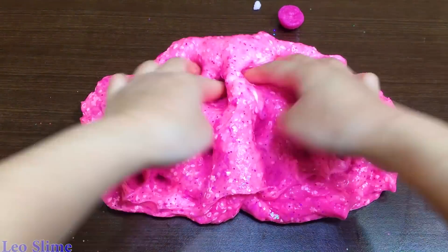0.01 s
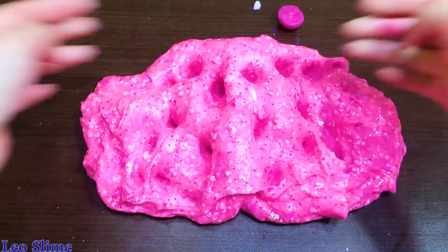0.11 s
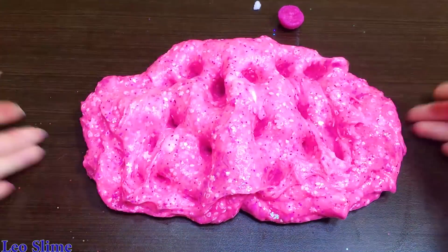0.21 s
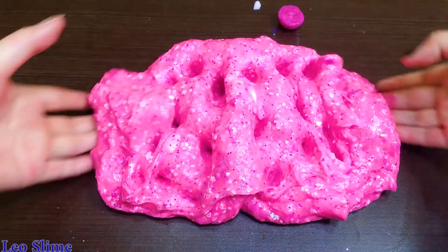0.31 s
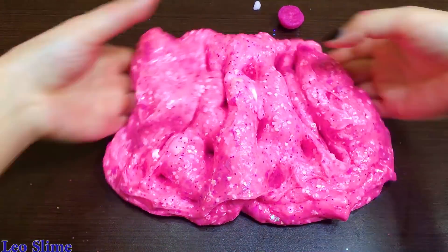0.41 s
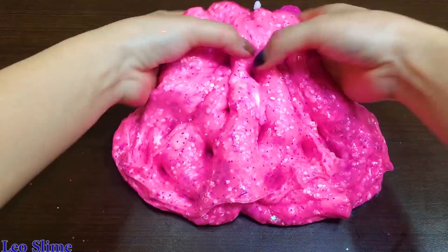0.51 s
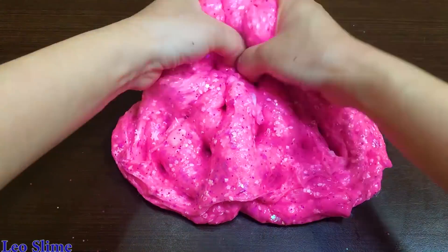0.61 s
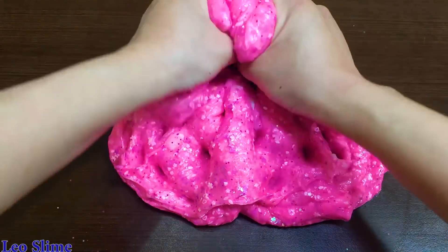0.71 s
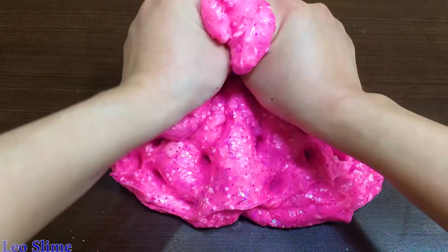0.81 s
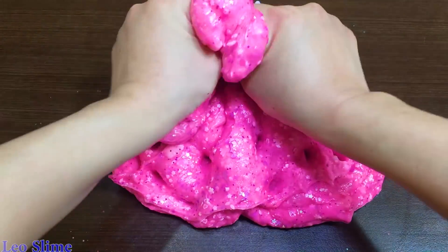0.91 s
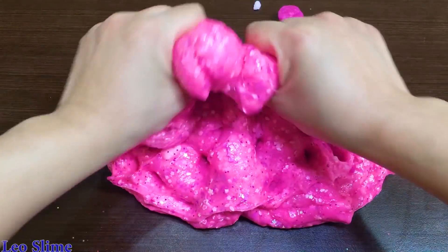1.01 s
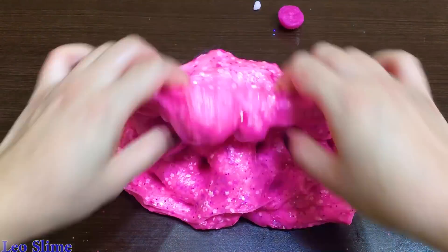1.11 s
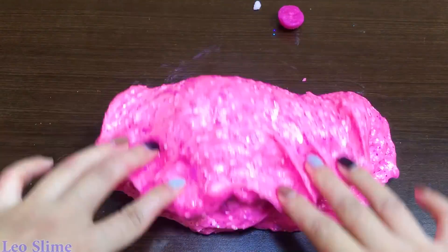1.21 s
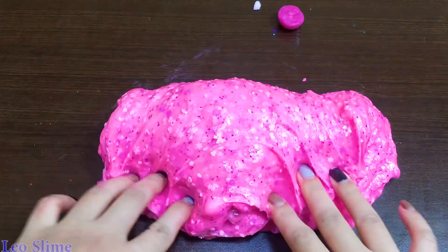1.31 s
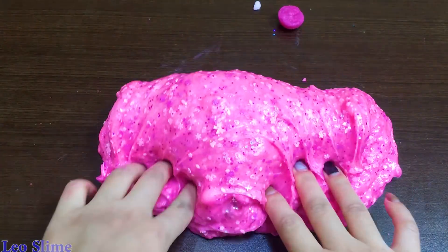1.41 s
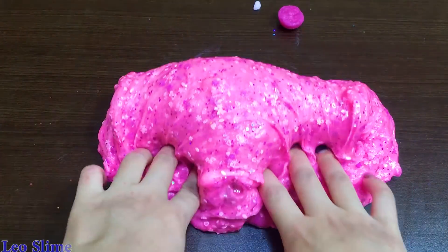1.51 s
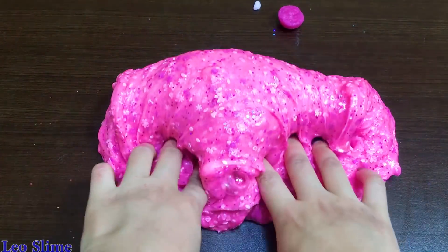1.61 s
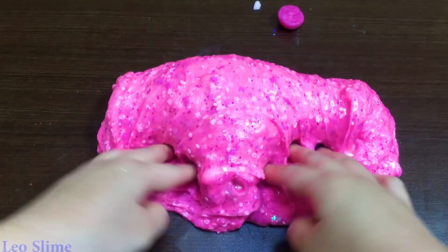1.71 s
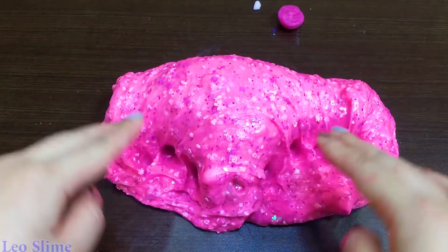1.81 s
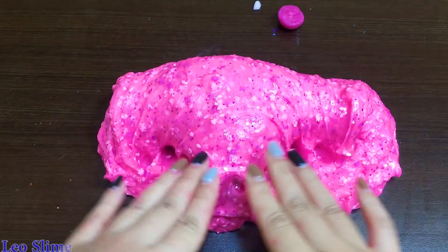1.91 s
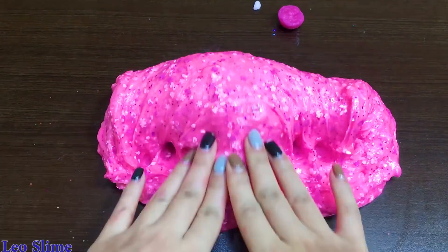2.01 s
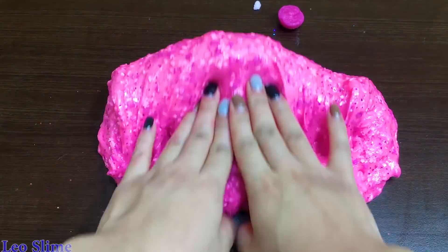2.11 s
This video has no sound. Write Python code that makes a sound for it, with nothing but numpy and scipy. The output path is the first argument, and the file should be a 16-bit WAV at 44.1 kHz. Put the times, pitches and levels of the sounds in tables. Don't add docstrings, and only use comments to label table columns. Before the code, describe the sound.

Hands work wet slime on a wooden table, very close and dry: one sharp rip and burst early, dense bubble snaps while folding, a fainter crackly lull, then a squelchy cluster of pops and low thump.

```python
import sys
import numpy as np
from scipy import signal
from scipy.io import wavfile
from scipy.ndimage import uniform_filter1d

SR = 44100
rng = np.random.default_rng(int(sys.argv[2]) if len(sys.argv) > 2 else 0)


def how_loud(loudness_db):
    steps = np.asarray(loudness_db, float) / 20
    return 10 ** steps


def wrap_up_sound(samples):
    columns = np.atleast_2d(samples).T
    tamed = np.clip(columns, -1, 1)
    steps = np.round(tamed * 32767).astype(np.int16)
    wavfile.write(sys.argv[1], SR, steps)


N = 97020


def evened(x):
    return x / np.sqrt(np.mean(x ** 2) + 1e-20)


def coloured(x, points):
    f, level = np.transpose(points)
    hz = np.abs(np.fft.fftfreq(4096, 1 / SR))
    level_db = np.interp(np.log(hz + 1), np.log(f), level, left=-70, right=-70)
    log_gain = np.log(how_loud(level_db))
    phase = -signal.hilbert(log_gain).imag
    taps = np.fft.ifft(np.exp(log_gain + 1j * phase)).real[:2048]
    return signal.oaconvolve(x, taps)[:len(x)]


def band(x, low_hz, high_hz):
    return signal.sosfilt(signal.butter(2, [low_hz, high_hz], "band", fs=SR, output="sos"), x)


def add(mix, s, sound):
    part = mix[max(round(s * SR), 0):][:len(sound)]
    part += sound[:len(part)]


def room_floor():
    # f/Hz, level/dB per Hz
    spectrum = [(30, -19), (60, -3.5), (250, -14.5), (1000, -19.5), (3000, -40.5), (15500, -39.5),
                (16300, -77.5)]
    return how_loud(-66) * evened(coloured(rng.standard_normal(N), spectrum))


def effort(column):
    # t/s, peeling fizz/dB, wet squish/dB
    knead = np.transpose([(0, -69, -59), (.37, -75, -62.5), (.455, -59, -54), (0.466, -45, -45),
                          (.61, -49, -43), (0.681, -58, -52.5), (.82, -56, -48), (.93, -49, -55.5),
                          (1.05, -53.5, -52), (1.15, -58.5, -65), (1.265, -40.5, -51), (1.35, -64, -62),
                          (1.43, -62.5, -62.5), (1.498, -52, -55), (1.6, -67, -63), (1.71, -63.5, -57.5),
                          (1.821, -70, -63.5), (2.001, -73, -69.5)])
    # t/s, rise/s per 20 dB, fizz/dB, squish/dB, t60/s
    tears = [
        (0.186, 0.029, -43, -70, 0.046),
        (0.203, 0.00056, -22.5, -37, 0.028),
        (0.22, .003, -36.5, -30, 0.18),
        (0.393, 0.0017, -58, -39, 0.1),
        (0.406, 0.002, -46.5, -31, 0.16),
        (1.031, 0.0033, -39, -59, 0.18),
        (1.858, 0.021, -52, -63, 0.061),
        (1.878, 0.0086, -32.5, -31.5, 0.098),
        (1.9, 0.0053, -46, -32.5, 0.19),
    ]
    t = np.arange(N) / SR
    power = how_loud(np.interp(t, knead[0], knead[column])) ** 2
    for row in tears:
        start_s, rise_s, t60_s = row[0], row[1], row[4]
        late = t - start_s
        slope_db = np.where(late < 0, 20 * late / rise_s, -60 * late / t60_s)
        power = power + how_loud(row[1 + column] + slope_db) ** 2
    return np.sqrt(power)


def crackle(per_s, spread_db, points, smooth):
    clump = how_loud(2.6 * evened(uniform_filter1d(rng.standard_normal(N), 260)))
    size = how_loud(spread_db * np.minimum(rng.exponential(1, N), 3.6))
    happens = rng.random(N) < per_s / SR
    ruptures = size * happens * rng.choice([-1, 1], N)
    grains = evened(ruptures) + smooth * rng.standard_normal(N)
    return evened(coloured(clump * grains, points))


def fizz():
    # f/Hz, level/dB per Hz
    spectrum = [(710, -44), (1200, -4), (1860, -6.5), (3920, -10), (6430, -6.5), (13700, -11.5),
                (15800, -9), (16500, -46)]
    return effort(1) * crackle(3500, 3.0, spectrum, 0.55)


def squish():
    # f/Hz, level/dB per Hz
    spectrum = [(76, -60.5), (130, -6), (321, 1.5), (553, -3), (706, -6.5), (901, -5), (4000, -15),
                (5200, -22.5), (8800, -120)]
    return effort(2) * crackle(900, 2.0, spectrum, 1.6)


def table():
    # f/Hz, level/dB, t60/s
    modes = [(55.95, -1, 0.92), (80.8, -5, 0.29), (108.8, -6.5, 0.6), (164.4, -12.5, 0.56),
             (233.8, -10, 0.35), (286, -15, 0.51), (345.3, -12, 0.063)]
    # t/s, level/dB, extra level on the two lowest modes/dB
    pushes = [(0, -61, 11), (.205, -39.5, -7), (.4, -42.5, -2), (.5, -49.5, -3), (.6, -38, -16),
              (.72, -47, -3.5), (.82, -63, 13.5), (.9, -69.5, 14), (.99, -69, 13.5), (1.28, -57.5, 2.5),
              (1.4, -71.5, 9), (1.74, -54.5, -4), (1.885, -33, -12)]
    # from t/s, to t/s
    hands_on = (.3, 1.2)
    push_ms, hum_db, hands_damping = 2.5, -58, 0.75
    t, out = np.arange(SR) / SR, np.zeros(N)
    drive = how_loud(hum_db) * np.sqrt(effort(2) / how_loud(-53.5)) / 60
    stir = rng.standard_normal((len(modes), N)) * drive
    turn = rng.random((len(pushes), len(modes)))
    load = uniform_filter1d(uniform_filter1d(rng.standard_normal((len(modes), SR)), 900), 900)
    for k, (hz, db, t60) in enumerate(modes):
        fade = how_loud(db - 60 * t / t60 + 2.5 * (k > 0) * evened(load[k]))
        out += signal.fftconvolve(stir[k], fade * np.sin(2 * np.pi * hz * t))[:N]
        for n, (s, push_db, low_db) in enumerate(pushes):
            damp = hands_damping if hands_on[0] < s < hands_on[1] else 1
            rise = 1 - np.exp(-t * 1000 / push_ms)
            extra_damping = how_loud(60 * t / t60 * (1 - 1 / damp))
            gain = how_loud(push_db + 4 + low_db * (k < 2))
            ring = np.sin(2 * np.pi * (hz * t + turn[n, k]))
            add(out, s, gain * rise * extra_damping * fade * ring)
    return out


def ticks():
    # t/s, peak level/dB, f/Hz
    early = [(0.0292, -51, 5600), (0.0441, -51, 2500), (0.0593, -42.5, 1500), (0.0848, -47.5, 12000),
             (0.095, -45.5, 1610), (0.0994, -42, 11700), (0.2172, -13, 5800), (0.2209, -19.5, 11620),
             (0.3803, -44.5, 1500), (0.4064, -17, 6360), (0.4672, -34, 11900), (0.5004, -36, 14200),
             (0.6026, -32, 4040), (0.6039, -42, 9600), (0.6068, -33, 4630), (0.6868, -38, 6200),
             (0.6914, -29, 4800), (0.7243, -41.5, 13100), (0.738, -31.5, 2600), (0.745, -33.5, 15060),
             (0.769, -41.5, 9200), (0.8178, -38.5, 12900), (0.8496, -27, 9700), (0.8527, -38.5, 14200),
             (0.8725, -33.5, 12900), (0.8764, -32, 5560), (0.8973, -28.5, 7200), (0.9129, -26.5, 6930),
             (0.9261, -30.5, 11900), (0.9371, -30, 14100), (0.9437, -38, 2400), (0.9608, -14.5, 9000),
             (1.0095, -20.5, 3070), (1.0567, -33.5, 12800), (1.0675, -29.5, 12280), (1.0823, -31, 3000),
             (1.13, -39, 1600)]
    late = [(1.1878, -40, 2000), (1.2088, -40.5, 3200), (1.3009, -31.5, 9600), (1.3375, -37, 1280),
            (1.4028, -52, 11500), (1.4201, -50.5, 14200), (1.4374, -38, 6500), (1.4586, -26.5, 3840),
            (1.4839, -38, 10400), (1.5145, -33, 11900), (1.5166, -33.5, 6950), (1.5302, -36.5, 1400),
            (1.5592, -42.5, 9600), (1.5743, -48, 5100), (1.5918, -52, 5000), (1.6019, -45, 4060),
            (1.6423, -47, 1400), (1.6596, -49, 5000), (1.6622, -50, 15100), (1.6732, -34, 9500),
            (1.7094, -46, 9400), (1.7252, -40.5, 2080), (1.8255, -44.5, 9000), (1.8468, -40, 7000),
            (1.8631, -41, 6300), (1.874, -32, 9600), (2.1842, -50.5, 1400)]
    # t/s, level/dB, f/Hz, decay/ms per 20 dB
    slumps = [
        (.2013, -4.5, 6440, 2.5),
        (.2025, -18, 756, 8),
        (.2195, -21.5, 605, 10),
        (.7035, -27.5, 486, 4),
        (.7835, -17.5, 456, 4),
        (1.0105, -23, 510, 2.5),
    ]
    tick_ms, edge_ms = 0.88, 0.7
    t, out = np.arange(1500) / SR, np.zeros(N)
    rows = early + late
    for (s, db, hz), noise in zip(rows, rng.standard_normal((len(rows), 1500))):
        ring_ms = tick_ms * (8000 / hz) ** 0.5
        ring = np.sin(2 * np.pi * hz * t) * how_loud(-20 * t * 1000 / ring_ms)
        edge = how_loud(-20 * t * 1000 / edge_ms) * band(noise, 2200, 20000)
        onset = np.minimum(t * SR / 6, 1)
        add(out, s, how_loud(db) * onset * (ring + edge))
    for s, db, hz, ms in slumps:
        swell = 1 - np.exp(-t * hz)
        add(out, s, how_loud(db - 20 * t * 1000 / ms) * swell * np.sin(2 * np.pi * hz * t))
    return out


def pop(db, hz, second_db):
    pocket_ms, plop_ms, thud_ms, snap_ms, crack_ms, spray_ms = 1.57, 1.73, 4, 1, 3, 14
    pocket_db, twin_db, thud_db, crack_db, spray_db = 1, -9, -8.5, -5, -21
    plop_hz, thud_hz, snap_hz = 1650, 640, 10040
    t = np.arange(1200) / SR
    plop_db, snap_db = (-40, second_db) if hz < 3300 else (second_db, -9)
    noise, detune = rng.standard_normal((3, 1200)), rng.uniform(0.737, 1.183, 3)
    size = (5000 / hz) ** 0.5

    def fade(ms):
        return np.minimum(t * SR / 4, 1) * how_loud(-20 * t * 1000 / ms)

    def ring(f):
        return np.sin(2 * np.pi * f * t)

    twin = how_loud(twin_db) * ring(hz * (0.643 + 0.456 * detune[2]))
    pocket = how_loud(pocket_db) * (ring(hz) + twin) * fade(pocket_ms * size)
    plop = how_loud(plop_db) * ring(plop_hz * detune[0]) * fade(plop_ms)
    snap_tone = ring(snap_hz * detune[1]) + 0.17 * band(noise[0], 8000, 11000)
    snap = how_loud(snap_db) * snap_tone * fade(snap_ms)
    crack = how_loud(crack_db) * band(noise[1], 1200, 11000) * fade(crack_ms)
    spray = how_loud(spray_db) * band(noise[2], hz * 0.44, min(hz * 1.57, 15000)) * fade(spray_ms)
    thud = how_loud(plop_db + thud_db) * ring(thud_hz * detune[1]) * fade(thud_ms) * (hz < 5720)
    burst = band(pocket + plop + thud + snap + crack + spray, 293, 18000)
    return how_loud(db) * burst / np.abs(burst).max()


def pops():
    # t/s, peak level/dB, pocket f/Hz, second voice level/dB
    lift = [(0.0442, -49, 760, -5), (0.186, -30, 4940, 0.5), (0.2015, 5, 4820, -23), (0.217, -10, 1740, 6),
            (0.2272, -16, 12600, -15.5), (0.239, -21.5, 6470, -1.5), (0.2017, -10.5, 9380, -30),
            (0.3916, -41, 766, 2), (0.397, -41, 740, -1), (0.4065, -36.5, 767, -10),
            (0.4752, -27.5, 5800, -16), (0.5256, -40, 1150, -5), (0.5367, -26.5, 7940, 3),
            (0.565, -24, 11680, -23), (0.5689, -23, 5930, -3.5), (0.6019, -31, 2630, -17),
            (0.6237, -27.5, 5910, 3), (0.6408, -27, 1820, -24)]
    fold = [(0.6901, -29.5, 1650, -10), (0.7024, -11, 6200, -11), (0.729, -19.5, 10050, -11),
            (0.7641, -26, 2320, -1), (0.7825, -3, 5800, -12.5), (0.7914, -10, 9100, -10),
            (0.8389, -25.5, 4600, -16.5), (0.8498, -28, 3280, -3), (0.868, -30.5, 2050, 0),
            (0.8932, -27, 2300, -2), (0.8977, -21.5, 2150, 7.5), (0.9171, -23, 6670, -24),
            (0.9609, -15.5, 1584, 0.5), (0.965, -14.5, 5700, -13.5), (0.9866, -34.5, 1760, -5),
            (1.0095, -24, 1715, -3.5), (1.0138, -25, 13730, -13.5), (1.0276, -5.5, 6890, -12.5),
            (1.0276, -14.5, 2300, 4), (1.0318, -9.5, 6000, -35.5), (1.031, -11.5, 9200, -28),
            (1.0861, -31.5, 6230, -8)]
    press = [(1.1744, -28, 5970, -11), (1.2977, -34, 1710, 12), (1.38, -45, 14700, -11.5),
             (1.4374, -44, 990, -1), (1.447, -31, 1570, 9), (1.4592, -32.5, 1380, -13),
             (1.4616, -30, 6800, -9), (1.4664, -21.5, 1024, -22), (1.4865, -33, 3060, -10),
             (1.4981, -34, 10300, -6), (1.5019, -32.5, 15570, -17), (1.5105, -29.5, 9860, -1.5),
             (1.5262, -36, 9400, -20), (1.5395, -39.5, 11600, -15), (1.6285, -47.5, 9870, -6),
             (1.673, -36, 6070, -5), (1.6874, -43, 770, 12), (1.706, -37, 9200, -10),
             (1.7759, -43.5, 770, 9)]
    pull = [(1.8553, -37, 1400, -3), (1.8778, -16.5, 1560, -8), (1.8847, -16, 7200, -14),
            (1.889, -31, 776, 7), (1.896, -13.5, 2960, 4), (1.8973, -6.5, 7340, -13),
            (1.9028, -18, 6160, -9), (1.9099, -14.5, 5980, -10), (1.9129, -22.5, 2720, -18),
            (1.9178, -28.5, 2480, -12.5)]
    out = np.zeros(N)
    for s, *row in lift + fold + press + pull:
        add(out, s, pop(*row))
    return out


def squeak():
    # half length/s, f/Hz, level/dB
    whistle = (0.0074, 2010, -38)
    half_s, hz, db = whistle
    t = np.arange(N) / SR
    swell = np.exp(-((t - 1.259) / half_s) ** 2)
    return how_loud(db) * evened(band(rng.standard_normal(N), hz * 0.9, hz * 1.04)) * swell


def room(x):
    tail_db, t60_s = -28.5, 0.16
    t = np.arange(6000) / SR
    tail = rng.standard_normal(6000) * (t > 0.002) * how_loud(-60 * t / t60_s)
    tail = signal.lfilter([1], [1, -0.5], tail)
    tail = how_loud(tail_db) * tail / np.linalg.norm(tail)
    return signal.fftconvolve(x, tail)[:N]


def scene():
    slime = fizz() + squish() + ticks() + pops() + squeak()
    return (slime + room(slime) + table() + room_floor())[None]


def roll_off(x):
    return signal.sosfilt(signal.butter(12, 16400, fs=SR, output="sos"), x)


def record(dry):
    x = signal.sosfilt(signal.butter(2, 40, "high", fs=SR, output="sos"), dry)
    x = signal.sosfilt(signal.butter(12, 16000, "low", fs=SR, output="sos"), x)
    return roll_off(np.clip(x, -1, 1))


dry = scene()
out = record(dry)
wrap_up_sound(out)
```